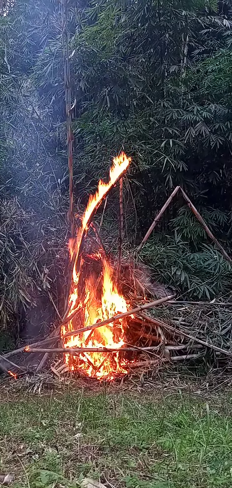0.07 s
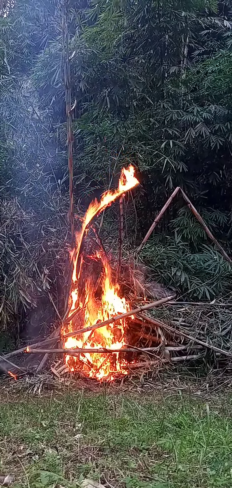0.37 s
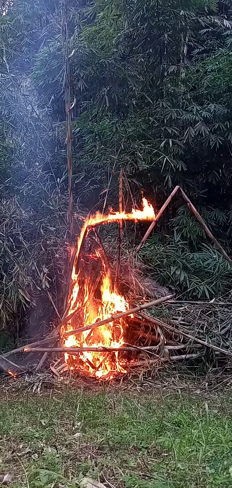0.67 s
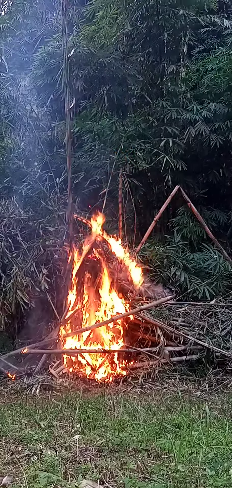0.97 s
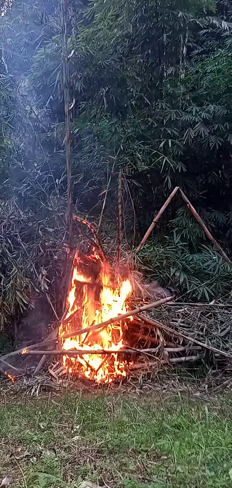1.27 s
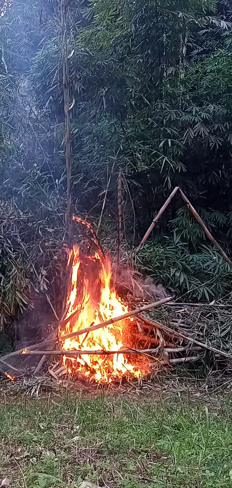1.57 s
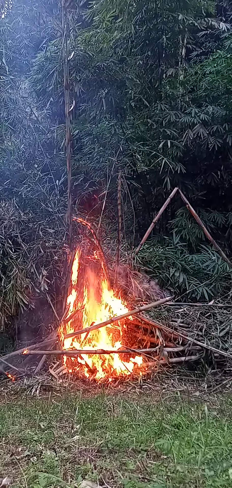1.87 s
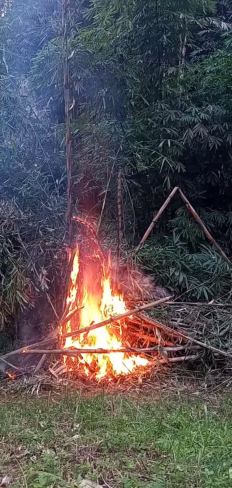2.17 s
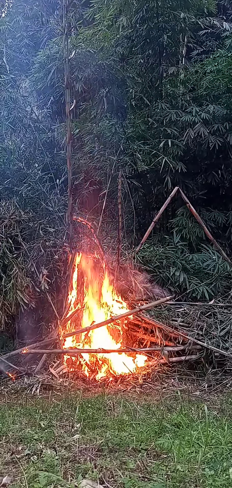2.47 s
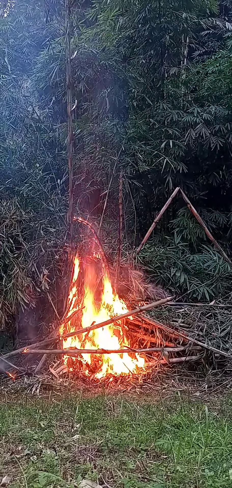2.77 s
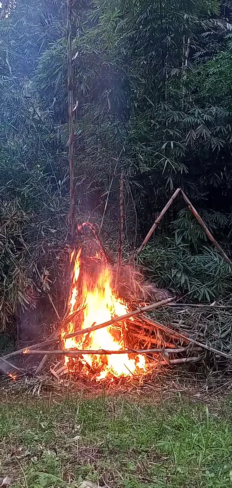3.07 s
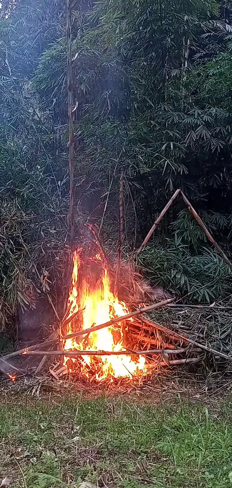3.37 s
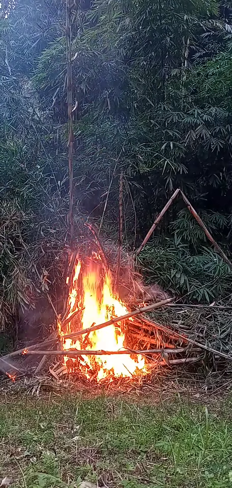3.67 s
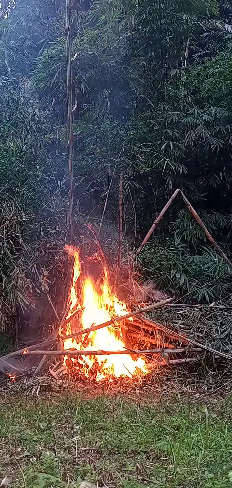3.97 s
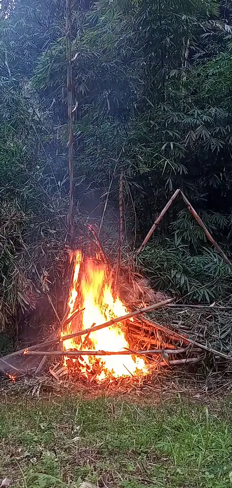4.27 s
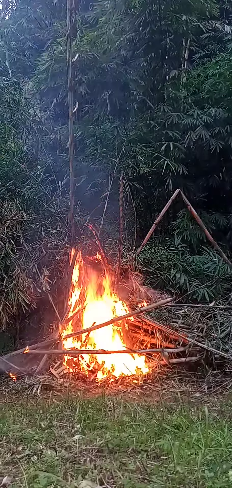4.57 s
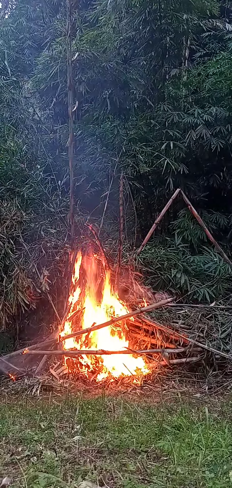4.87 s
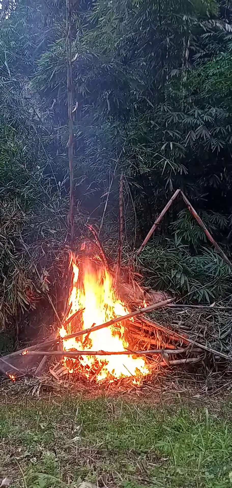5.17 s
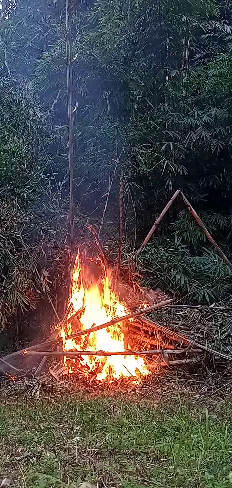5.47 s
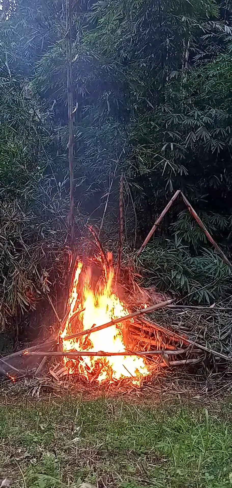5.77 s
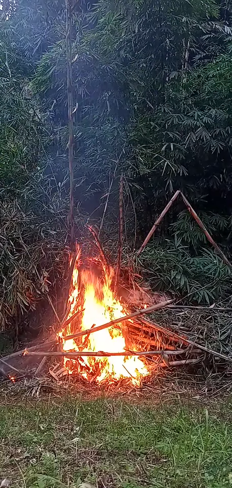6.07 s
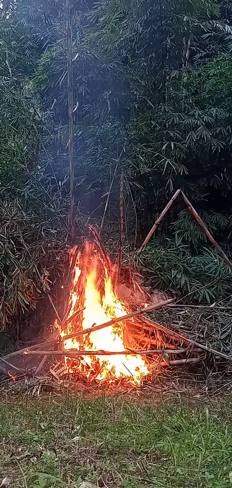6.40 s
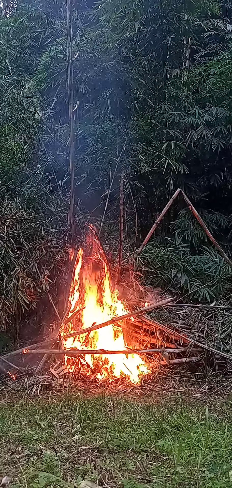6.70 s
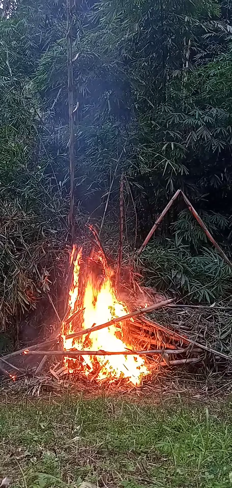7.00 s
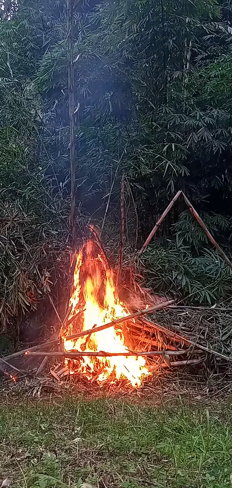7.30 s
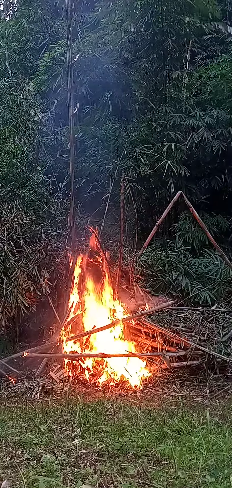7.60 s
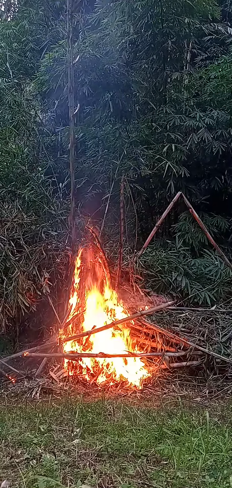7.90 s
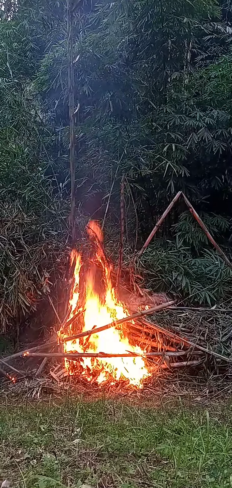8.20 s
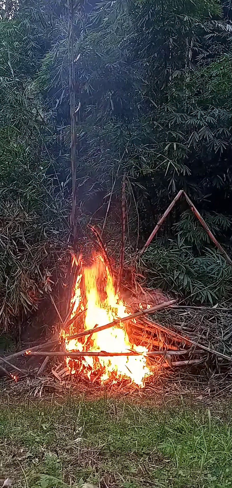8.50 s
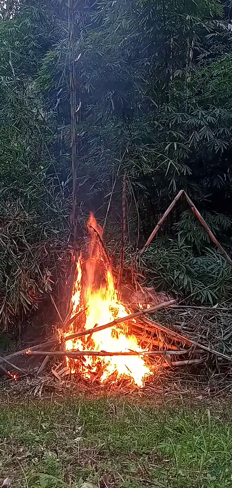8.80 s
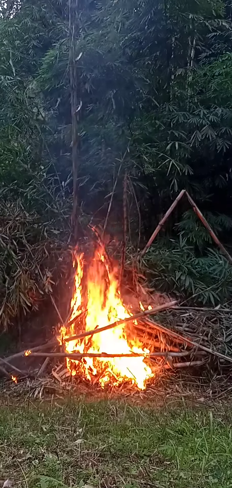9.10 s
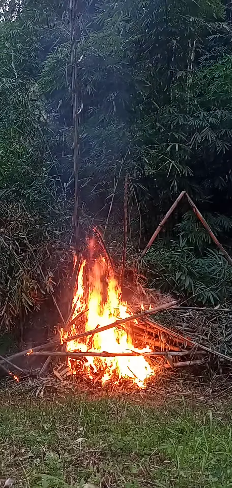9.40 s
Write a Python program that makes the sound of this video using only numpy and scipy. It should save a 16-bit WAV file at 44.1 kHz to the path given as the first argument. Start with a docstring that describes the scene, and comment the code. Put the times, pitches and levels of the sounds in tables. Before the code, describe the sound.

Flames rumble and flutter steadily outdoors as twigs tick and split and boiling sap hisses, heard slightly from the left. A strong surge of sizzling and snapping comes near the start, then the fire settles. In the second half, two sealed bamboo canes explode a couple of seconds apart, the second the loudest, each briefly overloading the microphones and ringing back from the forest edge. Sizzling and woody cracks continue to the end.

```python
"""A bonfire of bamboo and brush burns in a clearing, to one side of a pair of microphones.
Turbulent flames give a low, fluttering roar; boiling sap sizzles on top and flares up, once strongly.
Thin twigs tick deep in the pile, and others split with a snap and a trail of splinters.
Steam bursts sealed canes, two of them like shots that overload the microphones
and echo from the forest edge."""
import sys
import numpy as np
from scipy import signal
from scipy.fft import rfft, irfft, next_fast_len
from scipy.io import wavfile
from scipy.ndimage import uniform_filter1d

SR = 44100
rng = np.random.default_rng(int(sys.argv[2]) if len(sys.argv) > 2 else 0)


def persist_wave(psi):
    """Save psi, clipped to +-1, as 16-bit WAV."""
    counts = np.round(np.clip(psi, -1, 1) * 32767).astype(np.int16)
    wavfile.write(sys.argv[1], SR, np.atleast_2d(counts).T)


N = 425565

# Tone of the shaded right microphone against the left. Each row: frequency in Hz, gain in dB.
RIGHT_SHADE = [(60, -3.5), (200, -8.5), (700, -2.5), (1300, -11.5), (2400, -12), (4400, -8), (8000, -12),
               (11000, 5), (15000, -4.5)]
# How alike the two sides sound. Each row: frequency in Hz, likeness from 0 to 1.
STEREO_LIKENESS = [(50, 0.93), (250, 1), (700, 0.65), (1500, 0.42), (3000, 0.21), (6000, 0), (16000, 0)]
# Flames, tall at first, then sinking to a steady burn. Each row: time in seconds, relative level in dB.
FLAME_SIZE = [(0, -42.5), (1.0, -43), (1.28, -40), (1.57, -45.5), (1.78, -51.5), (2.9, -50), (4.5, -49.5),
              (9.65, -48.5)]
# Tone of the roar and rush at the microphones, with notches from the ground reflection.
# Each row: frequency in Hz, relative level in dB.
LOW_ROAR_TONE = [(20, -23.5), (40, -27), (65, -6), (100, 0.5), (170, 0), (240, -6.5), (340, -27),
                 (500, -21.5), (680, -49), (850, -33.5), (1500, -29.5), (4000, -63.5)]
BRIGHT_ROAR_TONE = [(120, -33), (260, 4), (450, 0.5), (680, -3.5), (850, -1.5), (1200, -3), (2500, -8.5),
                    (6000, -41.5)]
RUSH_TONE = [(150, 2.5), (450, -5), (560, -5), (680, -15), (850, -2.5), (1020, -4.5), (1330, 4), (1520, -1),
             (1750, -0.5), (2120, 1), (2410, -2.5), (2750, 4.5), (3700, 1), (5500, -14), (9000, 1),
             (16000, -65)]
# Tone of the sizzle and snaps as heard, including the microphones' treble peaks and dip.
# Each row: frequency in Hz, relative level in dB.
HEARD_SIZZLE_TONE = [(700, -42), (1800, -10.5), (2450, -12.5), (3000, -6.5), (3900, -3), (4900, -2.5),
                     (5400, -5), (6500, 1.5), (7600, 1), (9000, -9), (11000, -12), (13000, -17),
                     (13900, -10), (14700, -12), (15800, 0.5)]
HEARD_SNAP_TONE = [(200, 4), (700, -1), (1400, 8), (2700, -1), (3800, 6), (5400, -2.5), (7400, 10.5),
                   (9000, 4.5), (13000, -27), (15000, 12)]
# Pockets of sap boil off, or run dry where the lift is negative. Each row: peak time, rise and fall
# in seconds, lift of the sizzle and of the jets in dB.
SAP_FLARES = [(1.61, 0.24, 0.28, 11, 12.5), (2.1, 0.59, 0.37, 4.5, 6), (3.96, 0.26, 0.15, 0.7, 6),
              (4.45, 0.088, 0.17, -0.5, -7), (4.78, 0.15, 0.24, 4, 1), (6.07, 0.029, 0.074, 3, 9),
              (8.1, 0.12, 0.44, 4, 8.5)]
# Gas spurts as the fire flares up. Each row: peak time and half length in seconds, lift in dB.
GAS_SPURTS = [(1.299, 0.032, 12.5), (1.393, 0.045, 9)]
# Sharp woody cracks: splitting twigs, and at 6.11 s the trees' echo of the preceding snap.
# Each row: start in seconds, relative wood level in dB, wood pitch in Hz,
# splinter t60 in seconds, relative level of the skin's tick in dB.
WOODY_CRACKS = [(0.199, -18, 3250, 0.084, -36), (0.246, -25, 7000, 0.015, -39.5),
                (0.476, -26, 7360, .012, -40), (0.849, -33, 1320, 0.043, -44),
                (1.0883, -30, 2040, 0.057, -30), (1.239, -19.5, 2780, 0.053, -45),
                (1.2817, -23.5, 3900, 0.085, -26), (1.361, -20.5, 3460, 0.19, -28),
                (1.3703, -28, 1280, 0.057, -27), (1.4356, -17, 4750, 0.044, -19),
                (1.4587, -27, 3340, 0.074, -17.5), (1.4689, -14.5, 3820, 0.26, -23.5),
                (1.606, -23, 1480, 0.017, -35), (1.7398, -14, 3260, 0.07, -31),
                (1.7818, -31, 4100, .02, -36), (1.8662, -41, 4510, 0.013, -20.5),
                (2.078, -21, 4330, 0.11, -30), (2.3652, -23, 3470, 0.026, -27),
                (2.374, -22.5, 3530, 0.014, -19.5), (2.454, -32, 4230, 0.059, -23.5),
                (2.787, -26.5, 3930, 0.039, -29), (2.881, -29.5, 3360, 0.066, -34),
                (3.2002, -31, 3480, 0.043, -27), (3.4985, -17, 3870, 0.0052, -26.5),
                (3.5639, -21, 4360, 0.011, -23.5), (3.812, -29.5, 3820, 0.0091, -26),
                (3.8378, -34, 3750, 0.02, -29.5), (3.923, -27.5, 2080, 0.058, -44),
                (3.9934, -22.5, 3570, 0.13, -40), (4.029, -28, 2800, 0.059, -47),
                (4.078, -31, 1430, 0.034, -49), (4.1684, -27, 4370, 0.021, -27),
                (4.2208, -31, 3580, 0.017, -27), (4.3597, -30.5, 4020, .015, -26),
                (4.6196, -24, 1450, 0.042, -25), (4.7106, -25.5, 4420, 0.1, -24),
                (5.4105, -22.5, 7350, 0.0082, -38), (5.45, -27, 2980, 0.058, -27.5),
                (5.96, -42, 4700, 0.015, -27.5), (5.982, -32, 3500, 0.018, -36),
                (5.9893, -15.5, 3900, 0.034, -26), (5.9905, -20, 2450, 0.12, -44),
                (6.1125, -19, 2740, 0.037, -31), (6.4734, -27, 4450, 0.012, -40),
                (6.551, -38, 4460, 0.02, -26.5), (6.592, -42, 6500, .01, -32.5),
                (6.637, -35, 7000, .012, -32), (6.6565, -27, 4500, 0.015, -23),
                (6.7522, -23.5, 6360, 0.02, -31), (6.8084, -24.5, 6500, .02, -30),
                (6.8412, -33.5, 1220, 0.072, -43), (7.219, -31, 7400, .01, -33),
                (7.7053, -20.5, 3650, 0.14, -26), (7.973, -34, 3901, 0.01, -26.5),
                (8.0287, -31, 3400, 0.032, -38), (8.0505, -30, 2230, 0.035, -38),
                (8.218, -28, 2000, 0.027, -28), (8.271, -25.5, 4270, 0.021, -36),
                (8.309, -25, 7000, .015, -34), (8.3189, -25.5, 4360, 0.061, -24.5),
                (8.338, -35, 4500, .015, -33), (8.356, -21.5, 4530, 0.0215, -25.5),
                (8.429, -24, 4700, 0.028, -29), (8.442, -30, 2900, 0.054, -28),
                (8.4766, -19.5, 3240, 0.076, -28), (8.6932, -31, 3280, 0.042, -39),
                (8.793, -30.5, 4440, 0.017, -32), (8.89, -31.5, 2730, 0.049, -45),
                (8.9608, -34, 2130, 0.019, -30), (9.033, -33, 3350, 0.02, -27.5),
                (9.1088, -36.5, 1290, 0.063, -39), (9.267, -33, 3640, 0.044, -27),
                (9.504, -25, 3400, 0.018, -25), (9.5088, -14, 7800, 0.024, -31),
                (9.5087, -27, 2030, 0.04, -38)]
# The typical lesser twig: one row as above, without the start.
TYPICAL_SNAP = (-38.5, 4300, 0.13, -36)
# The echo starts with a strong near scatter, drops, then holds roughly level before dying away.
# Each row: delay in seconds, relative level in dB.
ECHO_CONTOUR = [(0, 9.5), (.024, -1.5), (.046, 2), (.085, 0), (.108, -1), (.142, 1)]
# Clumps of trunks throw back distinct slaps. Each row: delay in seconds, lift in dB, upper edge in Hz.
TRUNK_SLAPS = [(0.068, 7, 8000), (0.106, 8, 5000), (0.121, 8, 1300), (0.178, 10, 900), (0.232, 7, 900),
               (0.368, 7, 900)]
# The forest's ring. Each row: frequency in Hz, t60 in seconds.
FOREST_DECAY = [(150, 1.1), (600, 1.51), (1500, 0.88), (3000, 1.05), (6000, 0.53)]
# Brief dips around the brightest ticks. Each row: time in seconds, depth in dB.
LEVEL_DIPS = [(1.452, 4.5), (1.874, 15), (2.39, 6.5), (2.47, 6), (3.831, 11.5), (5.967, 8), (6.565, 3),
              (6.668, 6), (7.984, 14.5), (8.365, 6)]
# Bursting canes. Each row: start in seconds, blast gain in dB, time scale of the push in seconds,
# cavity pitch in Hz, cavity t60 in seconds, tear level within the blast in dB, echo level in dB,
# the echo's lower and upper edge in Hz, its decay time as a multiple of the forest's.
CANE_BURSTS = [(1.581, -29, 0.00075, 440, 0.029, 8, -8, 301, 1500, 1.5),
               (2.3658, -19, 0.0003, 1360, 0.0088, -5, -6, 700, 3000, 0.33),
               (5.0692, -6.5, 0.00049, 1070, 0.01, 2.5, 14.5, 1650, 2480, 0.67),
               (7.443, 5, 0.0007, 1275, 0.012, -7, 21, 88, 5120, 1.05)]
# What the trees send back of a burst. Each row: frequency in Hz, relative level in dB.
ECHO_TONE = [(60, -6), (150, -4), (240, 1.5), (340, -5), (560, 2), (780, -4.5), (1050, -1), (1450, -6),
             (1950, -2), (2600, -10.5), (3600, -11), (5500, -15), (14000, -29)]

PAD, PRE_ROLL_S = 128, 96 / SR  # silent samples ahead of a hit for filter ringing; its early start


def gain_of(db):
    """Decibels to a factor."""
    return 10 ** (np.asarray(db) / 20)


def unit_rms(x):
    """Scales to an rms of one."""
    return x / np.sqrt(np.mean(x ** 2) + 1e-20)


def curve_at(points, hz):
    """Reads a curve on a log-frequency axis."""
    f, value = np.transpose(points)
    return np.interp(np.log(hz + 1), np.log(f + 1), value)


def add(mix, s, sound):
    """Mixes a stereo sound in at time s."""
    part = mix[:, max(round(s * SR), 0):][:, :sound.shape[1]]
    part += sound[:, :part.shape[1]]


def colour(x, gain):
    """Filters by a gain that is a function of frequency."""
    size = next_fast_len(x.shape[-1] + 512)
    return irfft(rfft(x, size) * gain(np.fft.rfftfreq(size, 1 / SR)), size)[..., :x.shape[-1]]


def wander(rate_hz):
    """Random drift of unit size, mostly slower than the given rate."""
    return unit_rms(colour(rng.standard_normal(N), lambda f: 1 / (1 + (f / rate_hz) ** 2)))


def hump(f, centre_hz, octaves):
    """A resonance, bell-shaped on a log-frequency axis."""
    return 1 / (1 + (np.log2((f + 1) / centre_hz) / octaves) ** 2 / 2) ** 2


def patches(shape, frames):
    """Smooth random blotches over frequency and time, of unit size."""
    drift = uniform_filter1d(rng.standard_normal(shape), size=frames, axis=1)
    return unit_rms(uniform_filter1d(drift, size=4, axis=0))


def at_mics(pair, shade=1, bounce=0.11, bounce_s=0.002328, lead_s=0.00085):
    """Adds the ground bounce; the right microphone hears it all earlier, shaded, its treble scattered."""
    pair = colour(pair, lambda f: 1 + bounce * np.exp(-2j * np.pi * f * bounce_s) / (1 + (f / 4000) ** 2))
    alike = lambda f: np.clip(curve_at(STEREO_LIKENESS, f), 0, 1)
    right = colour(pair[0], alike) + colour(pair[1], lambda f: np.sqrt(1 - alike(f) ** 2))
    shading = lambda f: gain_of(shade * curve_at(RIGHT_SHADE, f))
    return np.array([pair[0], colour(right, lambda f: shading(f) * np.exp(2j * np.pi * f * lead_s))])


def voiced(pair, tone):
    """Gives an excitation its tone and its stereo place, at unit level."""
    return unit_rms(at_mics(colour(pair, lambda f: gain_of(curve_at(tone, f)))))


def flame_size():
    """The height of the flames as a gain for every sample."""
    return gain_of(np.interp(np.arange(N) / SR, *np.transpose(FLAME_SIZE)))


def flame_roar(rumble_db=4.0, flutter_db=2.0, growth=2.36):
    """Turbulent flames: a low rumble that flutters; tall tongues of flame add a brighter rush."""
    size = flame_size()
    rumble = gain_of(rumble_db) * size * voiced(rng.standard_normal((2, N)), LOW_ROAR_TONE)
    reach = size.max() * (size / size.max()) ** growth
    tongues = reach * voiced(rng.standard_normal((2, N)), BRIGHT_ROAR_TONE)
    return (rumble + tongues) * gain_of(flutter_db * wander(rate_hz=7.9))


def crackle(per_s, spread_db, t60, low_hz, high_hz, octaves):
    """Countless tiny ruptures of uneven size and pitch, each a very short puff of noise."""
    t, out = np.arange(1024) / SR, np.zeros((2, N))
    for centre_hz in np.geomspace(low_hz, high_hz, num=16):
        sizes = gain_of(spread_db * np.minimum(rng.exponential(1, N), 4))
        ruptures = sizes * (rng.random(N) < per_s / 16 / SR)
        puff = rng.standard_normal((2, len(t))) * gain_of(-60 * t / (t60 * rng.uniform(0.085, 3.9)))
        puff = unit_rms(colour(np.pad(puff, ((0, 0), (PAD, 0))), lambda f: hump(f, centre_hz, octaves)))
        out += signal.oaconvolve(ruptures[None], puff, axes=1)[:, :N]
    return unit_rms(out)


def boiling(sap_db=-41, jets_db=-54.5, calm_flame_db=-50.5, jet_growth=0.74):
    """Envelopes of the sizzle and the jets: both ride the sap flares; the jets also follow the flames."""
    t = np.arange(N) / SR
    sap = gain_of(sap_db)
    jets = gain_of(jets_db) * (flame_size() / gain_of(calm_flame_db)) ** jet_growth
    for s, rise_s, fall_s, sap_lift_db, jet_lift_db in SAP_FLARES:
        flare = np.exp(-abs(t - s) / np.where(t < s, rise_s, fall_s))
        sap, jets = sap * gain_of(sap_lift_db * flare), jets * gain_of(jet_lift_db * flare)
    return sap, jets


def gas_jets(patch_db=3.3, lull_db=2.1):
    """Gas rushes and spurts; neighbouring pitches swell and ebb apart as separate jets open and close."""
    t = np.arange(N) / SR
    grains = crackle(per_s=2500, spread_db=1.0, t60=0.0068, low_hz=396, high_hz=5080, octaves=2.3)
    bands = signal.stft(voiced(grains, RUSH_TONE), nperseg=512)[2]
    bands *= gain_of(patch_db * patches(bands.shape[1:], frames=14))
    rush = unit_rms(signal.istft(bands, nperseg=512)[1][:, :N])
    spurts_db = sum(db * np.exp(-((t - s) / half_s) ** 2) for s, half_s, db in GAS_SPURTS)
    return rush * gain_of(spurts_db + lull_db * wander(rate_hz=5))


def sap_sizzle(dip, hiss_db=5.5, fizz_db=-1.5, rush_db=3.5, flutter_db=0.95):
    """Boiling sap hisses and fizzes, with the wider gas jets rushing below it."""
    hiss = gain_of(hiss_db) * voiced(rng.standard_normal((2, N)), HEARD_SIZZLE_TONE)
    grains = crackle(per_s=960, spread_db=5.0, t60=0.0087, low_hz=2630, high_hz=14400, octaves=3.9)
    fizz = gain_of(fizz_db) * voiced(grains, HEARD_SIZZLE_TONE)
    rush = gain_of(rush_db) * gas_jets()
    sap_gain, jet_gain = boiling()
    steam = (hiss + fizz) * sap_gain * dip ** 0.99 + rush * jet_gain * dip
    return steam * gain_of(flutter_db * wander(rate_hz=34.0))


def twig_ticks(level_db=-54.5):
    """Thin twigs tick deep in the pile, at scattered pitches."""
    ticks = crackle(per_s=90, spread_db=3.4, t60=0.012, low_hz=2300, high_hz=7000, octaves=0.5)
    return gain_of(level_db) * voiced(ticks, HEARD_SNAP_TONE)


def fibres(envelope, gain):
    """A short spray of breaking fibres, scaled to an rms of one at its loudest moment on the left."""
    noise = np.pad(rng.standard_normal((2, len(envelope))) * envelope, ((0, 0), (PAD, 0)))
    spray = at_mics(colour(noise, gain))
    return spray / np.sqrt(uniform_filter1d(spray[0] ** 2, size=64).max())


def lesser_snaps(per_s=4.0, spread_db=7.0, spread_octaves=0.66):
    """Cue rows for lesser twigs that split at random, each with its own strength and pitch."""
    db, pitch_hz, t60, skin_db = TYPICAL_SNAP
    draws = rng.uniform(-1.1, 1, (round(per_s * N / SR), 4))
    return [((when + 1) / 2 * N / SR, db + spread_db * wood, pitch_hz * 2 ** (spread_octaves * tune),
             t60, skin_db + spread_db * skin) for when, wood, tune, skin in draws]


def woody_cracks(rise_s=0.00024, crack_t60=0.0043, splinter_db=-1.5, usual_t60=0.047,
                 ring_db=-6.5, ring_t60=0.007, tick_db=4.0, tick_t60=0.0035,
                 trail_db=-10.5, trail_t60=0.033, echo_db=-7.5):
    """The crack of a twig, direct or echoed: the skin ticks, the hollow wood rings and splinters."""
    t, out = np.arange(4096) / SR, np.zeros((2, N))
    tick_tone = lambda f: hump(f, 10400, octaves=1.13) * gain_of(curve_at(HEARD_SIZZLE_TONE, f))
    tick_shape = gain_of(-60 * t / tick_t60) + gain_of(trail_db - 60 * t / trail_t60)
    attack = 1 - np.exp(-t / rise_s)
    for s, db, pitch_hz, t60, skin_db in WOODY_CRACKS + lesser_snaps():
        shape = attack * (gain_of(-60 * t / crack_t60) + gain_of(splinter_db - 60 * t / t60))
        # a clean break has a narrower, purer pitch and rings louder
        width = 0.88 * (t60 / usual_t60) ** 0.17
        ring_gain = gain_of(ring_db) * (usual_t60 / t60) ** 0.25
        body = fibres(shape, lambda f: hump(f, pitch_hz, width) * gain_of(curve_at(HEARD_SNAP_TONE, f)))
        ring = ring_gain * fibres(gain_of(-60 * t / ring_t60), lambda f: hump(f, pitch_hz, octaves=0.15))
        tick = gain_of(skin_db + tick_db) * fibres(tick_shape, tick_tone)
        add(out, s - PRE_ROLL_S, gain_of(db) * (body + ring) + tick)
    echo = signal.fftconvolve(out, forest_echo(), axes=1)[:, :N]
    return out + gain_of(echo_db) * colour(echo, lambda f: hump(f, centre_hz=2320, octaves=1.66))


def forest_echo(stretch=1, slap_half_s=0.006):
    """A strong near scatter drops to a rough plateau, then dies away in lumps; trunks add slaps."""
    hz, t, bands = signal.stft(rng.standard_normal((2, SR)), SR, nperseg=256)
    lumps_db = 0.9 * unit_rms(uniform_filter1d(rng.standard_normal(len(t)), size=5))
    patches_db = 1.2 * patches(bands.shape[1:], frames=8)
    slaps_db = sum(db * np.exp(-((t - s) / slap_half_s) ** 2) / np.hypot(1, (hz[:, None] / edge_hz) ** 2)
                   for s, db, edge_hz in TRUNK_SLAPS)
    contour_db = np.interp(t, *np.transpose(ECHO_CONTOUR)) + slaps_db + lumps_db + patches_db
    t60 = stretch * curve_at(FOREST_DECAY, hz)[:, None]
    fall_db = -60 * np.maximum(t - ECHO_CONTOUR[-1][0], 0) / t60
    tail = signal.istft(bands * gain_of(contour_db + fall_db), SR, nperseg=256)[1]
    return tail / np.linalg.norm(tail[0])


def level_dips(fall_s=0.019, recover_s=0.032):
    """At each listed dip the level sinks quickly and comes back a little more slowly."""
    t = np.arange(N) / SR
    depth_db = sum(db * np.exp(-((t - s) / np.where(t < s, fall_s, recover_s)) ** 2)
                   for s, db in LEVEL_DIPS)
    return gain_of(-depth_db)


def cane_bursts(tear_t60=0.02, tear_hz=1950, push_db=1.0, push_lag=3.55, cavity_db=10.5, rise_s=0.00097):
    """Steam splits a sealed cane: the cavity knocks, wood tears, pressure pushes out, the trees answer."""
    t, out = np.arange(4096) / SR, np.zeros((2, N))
    low_cut = signal.butter(2, 135, "high", fs=SR)  # the bursts are thinned below about 135 Hz
    attack = 1 - np.exp(-(t / rise_s) ** 2)
    for s, db, push_s, cavity_hz, t60, tear_db, echo_db, low_hz, high_hz, stretch in CANE_BURSTS:
        opened = np.maximum(t / push_s - push_lag, 0)  # time since the wall gave way, in units of push_s
        push = gain_of(push_db) * np.sin(opened) * np.exp(-opened / 2.56)
        knock = np.sin(2 * np.pi * cavity_hz * t) * gain_of(cavity_db - 60 * t / t60) * attack
        tear = unit_rms(colour(rng.standard_normal((2, len(t))), lambda f: hump(f, tear_hz, octaves=0.8)))
        blast = push + knock + tear * gain_of(tear_db - 60 * t / tear_t60)
        blast = gain_of(db) * at_mics(np.pad(blast, ((0, 0), (PAD, 0))), shade=0.99)
        add(out, s - PRE_ROLL_S, signal.lfilter(*low_cut, blast))
        band = lambda f: f ** 2 / np.hypot(f ** 2, low_hz ** 2) / np.hypot(1, (f / high_hz) ** 2)
        echo = colour(forest_echo(stretch), lambda f: gain_of(curve_at(ECHO_TONE, f)) * band(f))
        echo = at_mics(echo, shade=0.86)
        add(out, s, gain_of(echo_db) * echo / np.linalg.norm(echo[0]))
    return out


def scene():
    """The burning pile; everything but the woody cracks takes the dips."""
    dip = level_dips()
    return (flame_roar() + twig_ticks() + cane_bursts()) * dip + sap_sizzle(dip) + woody_cracks()


def record(dry):
    """The loudest bursts clip at full scale; a steep low-pass takes off the very top."""
    clipped = np.clip(dry, -1, 1)
    low_pass = signal.firwin(511, 15780, window=("kaiser", 9), fs=SR)
    return signal.oaconvolve(clipped, low_pass[None], "same")


dry = scene()
out = record(dry)
persist_wave(out)
```